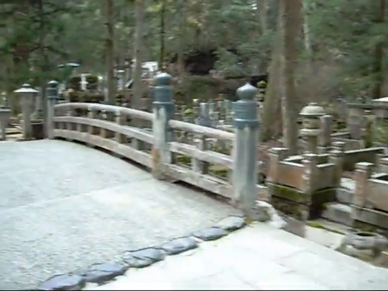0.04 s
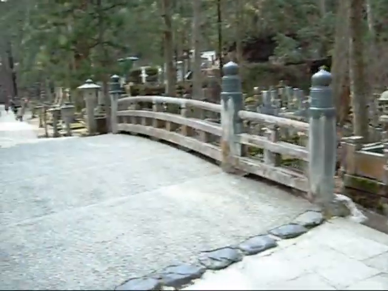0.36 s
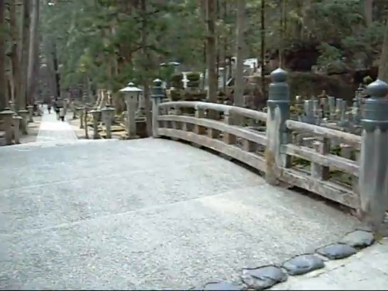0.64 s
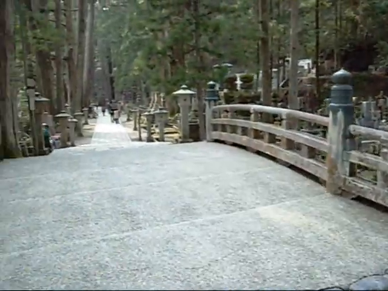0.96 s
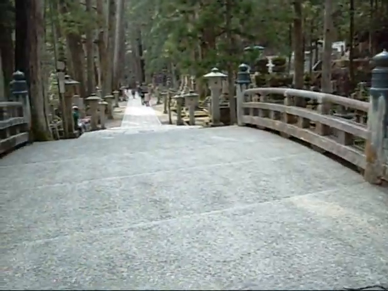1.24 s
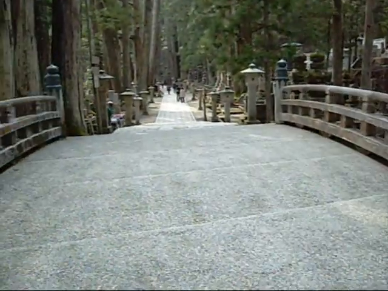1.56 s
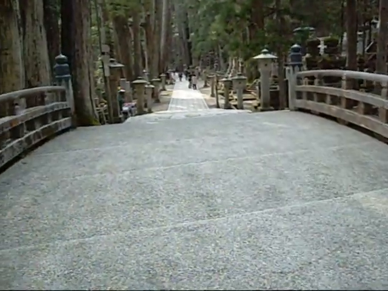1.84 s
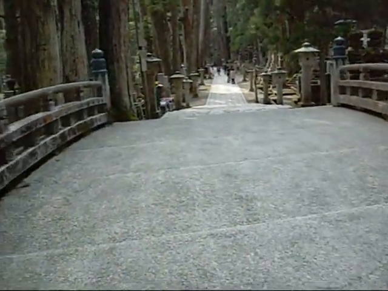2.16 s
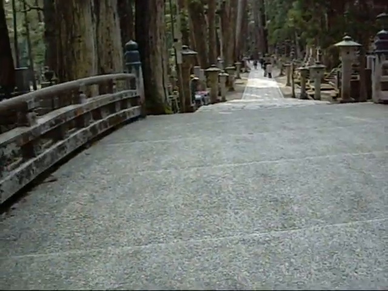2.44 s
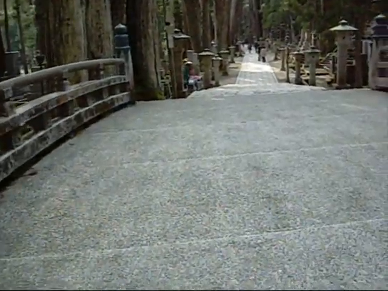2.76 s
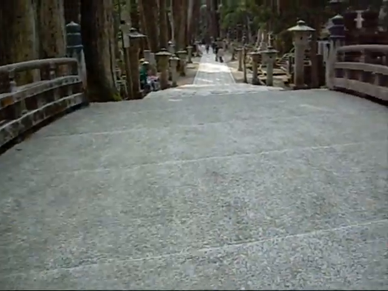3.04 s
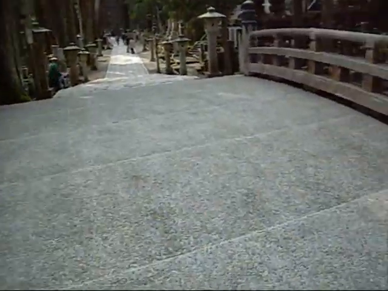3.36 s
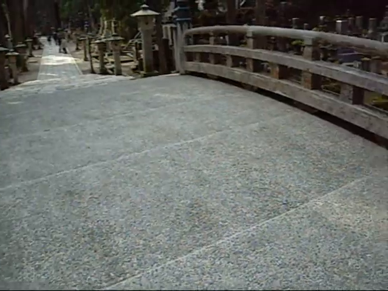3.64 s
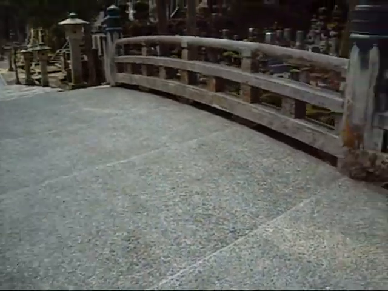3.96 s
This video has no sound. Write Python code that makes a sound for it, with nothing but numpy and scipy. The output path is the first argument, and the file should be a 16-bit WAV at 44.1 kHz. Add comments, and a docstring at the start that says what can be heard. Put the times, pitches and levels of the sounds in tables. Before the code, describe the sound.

A large distant bell is already humming at the start, one low, nearly pure tone that gently swells and dips. Between about 0.5 and 2 seconds, a few soft, slightly higher tones rise briefly beside it. Its faint overtones die first; the hum weakens from 2 seconds and is still faintly sounding at 4. Underneath lie a low outdoor rumble, a camera motor's faint hum and whine, and microphone hiss.

```python
"""A large bell, far off in a forest, heard on a stereo pair of microphones.
It is already humming at the start: one low, nearly pure tone that fades and swells as the listener
turns. In the first two seconds a few soft tones swell briefly beside it. The faint overtones die away
first; the hum is weaker but still sounding at the end. Under it all lie a low outdoor rumble and,
close by, the faint hum and whine of a camera motor and the hiss of the microphones."""
import sys
import numpy as np
from scipy import signal
from scipy.io import wavfile
from scipy.ndimage import uniform_filter1d

SR = 44100
rng = np.random.default_rng(int(sys.argv[2]) if len(sys.argv) > 2 else 0)


def materialize(psi):
    """Save the field psi as 16-bit PCM at rate SR to the path in sys.argv[1].

    A 1-D psi becomes a single channel; in a 2-D psi each row is a channel.
    """
    bounded = np.clip(np.atleast_2d(psi).T, -1, 1)
    quanta = np.round(bounded * 32767).astype(np.int16)
    wavfile.write(sys.argv[1], SR, quanta)


N = 176400

# microphone hiss (frequency [Hz], density [dB per Hz])
HISS_SPECTRUM = [(30, -112), (500, -105), (1500, -105), (3000, -106.2), (5000, -107.4), (7500, -108.3),
                 (10000, -110.3), (15000, -111.2)]
# outdoor rumble before its swells (frequency [Hz], density [dB per Hz])
RUMBLE_SPECTRUM = [(20, -120), (34, -108), (48, -92), (75, -83.5), (110, -78), (160, -82.5), (250, -88.5),
                   (370, -92), (500, -98), (700, -100.3), (1100, -108), (2500, -117), (8000, -135)]
# swells of the rumble (time [s], gain [dB])
RUMBLE_SWELLS = [(0, 0.5), (.8, 1), (1.5, 0), (2.3, 1), (2.9, 1), (3.25, 0), (3.7, 0), (4, 1.5)]
# hum of the camera motor (frequency [Hz], level [dB], left microphone's lead [rad])
MOTOR_LINES = [(117.7, -66.5, -0.82), (238, -76.5, -0.42), (467, -83.5, 0.83), (588, -84.5, 0.46),
               (710, -87.5, -0.18), (972, -91.5, .3), (1182, -96.5, .3)]
# thin whine of the camera (frequency [Hz], level [dB], left microphone's lead [rad])
WHINE_LINES = [(3158, -96, 1), (3187.5, -92, .5)]
# faint tones beside the bell's hum (centre time [s], length [s], pitch [Hz], peak level [dB])
SOFT_SWELLS = [(0.613, .26, 316, -71), (.78, 0.21, 319, -67), (1.003, .3, 316, -69),
               (1.404, 0.21, 371, -65), (1.74, 0.34, 375, -67)]
# the bell's hum at the microphones (time [s], level [dB])
BELL_LEVEL = [(0, -36), (.08, -34.9), (.24, -36), (.39, -34.5), (.48, -36.5), (.78, -36.1), (.91, -38.5),
              (1.02, -37.8), (1.11, -37), (1.33, -38.5), (1.43, -36.5), (1.71, -39.1), (1.81, -38.5),
              (2, -40.5), (2.12, -39.5), (2.3, -40.5), (2.57, -43.5), (2.78, -44.5), (3.11, -43),
              (3.18, -40.5), (3.33, -42.6), (3.49, -42), (3.68, -45), (3.75, -47.5), (3.84, -45.5),
              (4, -51.5)]
# pitch of that hum, sagging slightly (time [s], pitch [Hz])
BELL_PITCH = [(0, 211.0), (2.2, 211.3), (2.6, 210.6), (4, 210.8)]
# its place between the microphones (time [s], left minus right [dB])
BELL_PAN = [(0, .3), (2.2, -0.1), (2.85, 1), (3.4, 0), (4, -.6)]
# the bell's octave overtone, before its trim (time [s], level [dB])
BELL_OCTAVE = [(0, -77), (.17, -64.5), (.29, -76), (.4, -64.5), (.55, -67.5), (.67, -76.5), (.9, -81),
               (1.08, -68.5), (1.35, -73), (1.62, -69), (1.85, -73.5), (2.3, -79), (2.7, -82), (4, -90)]
# the bell's twelfth, before its trim (time [s], level [dB])
BELL_TWELFTH = [(0, -72), (.07, -73), (.25, -72), (.36, -68), (.46, -71), (.6, -69), (.78, -78), (.87, -68),
                (1, -74), (1.13, -85), (1.6, -79), (2.1, -84), (4, -92)]

# phase by which the left microphone leads
HUM_LEAD_RAD, OCTAVE_LEAD_RAD, TWELFTH_LEAD_RAD = -0.36, 0.5, -1.43
SIDES = np.array([[.5], [-.5]])  # left and right share of a difference
TIME = np.arange(N) / SR


def amp(db):
    """Decibels to gain."""
    return 10 ** (np.asarray(db) / 20)


def curve(points):
    """Joins (time, value) points by straight lines, with rounded corners."""
    times, values = np.transpose(points)
    return uniform_filter1d(np.interp(TIME, times, values), size=1500)


def drift(rate_hz):
    """Slow random wandering of unit size."""
    t = TIME[::128]
    rates = np.geomspace(rate_hz / 10, rate_hz, 20)
    wander = sum(np.sin(2 * np.pi * (hz * t + rng.random())) / np.sqrt(hz) for hz in rates)
    return np.interp(TIME, t, wander / wander.std())


def tone(phase, level_db, lead_rad, pan_db=0):
    """A sine at two microphones, with a phase and level difference between them."""
    return np.sqrt(2) * amp(level_db + SIDES * pan_db) * np.sin(phase + SIDES * lead_rad)


def noise(spectrum, correlation, pan_db, patch_db=0, size=2048):
    """Noise of a given density, partly shared by the two microphones, with drifting patches."""
    hz, hop = np.fft.rfftfreq(size, 1 / SR), size // 4
    a, b, c, d, patches = rng.standard_normal((N // hop + 5, len(hz), 5)).T
    patches = uniform_filter1d(patches, size=14, axis=1)  # smooth in time
    patches = uniform_filter1d(patches, size=3, axis=0)  # and in frequency
    left = a + 1j * b
    right = correlation * left + np.sqrt(1 - correlation ** 2) * (c + 1j * d)
    points_hz, points_db = np.transpose(spectrum)
    density_db = np.interp(np.log(hz + 1), np.log(points_hz), points_db)[:, None]
    bins = np.array([left, right]) * amp(density_db + patch_db * patches / patches.std())
    stereo = signal.istft(bins, nperseg=size, noverlap=size - hop)[1][:, :N]
    return stereo * np.sqrt(1.5 * SR / size) * amp(SIDES * pan_db)


def microphone_hiss():
    """The microphones' own steady noise, nearly independent left and right."""
    return noise(HISS_SPECTRUM, correlation=-0.049, pan_db=-0.3)


def outdoor_rumble():
    """Low, distant outdoor noise that gently swells and eases."""
    rumble = noise(RUMBLE_SPECTRUM, correlation=0.58, pan_db=-0.5, patch_db=1.72)
    return rumble * amp(curve(RUMBLE_SWELLS))


def camera_motor(waver_rad=0.24, waver_db=1.5):
    """Close to the microphones, a motor's faint wavering hum with a thin, steady whine on top."""
    hum = 0
    for hz, db, lead in MOTOR_LINES:
        phase = 2 * np.pi * hz * TIME + waver_rad * drift(rate_hz=8)
        hum += tone(phase, db + waver_db * drift(rate_hz=7.4), lead)
    whine = sum(tone(2 * np.pi * hz * TIME, db, lead) for hz, db, lead in WHINE_LINES)
    return hum + whine


def soft_tones():
    """Far-off pure tones, each one smooth swell."""
    tones = 0
    for centre, length, hz, db in SOFT_SWELLS:
        swell = np.cos(np.pi * np.clip((TIME - centre) / length, -.5, .5)) ** 2
        tones += tone(2 * np.pi * hz * TIME, db, HUM_LEAD_RAD) * swell
    return tones


def distant_bell(octave_trim_db=0.5, twelfth_trim_db=1, fall_db_per_s=4.5):
    """The hum and its overtones, each swelling and fading on its own way through the trees."""
    phase = 2 * np.pi * np.cumsum(curve(BELL_PITCH)) / SR
    hum_db = curve(BELL_LEVEL) + 0.4 * drift(rate_hz=9)  # the level flutters slightly
    hum = tone(phase, hum_db, HUM_LEAD_RAD, curve(BELL_PAN))
    octave = tone(2 * phase, curve(BELL_OCTAVE) + octave_trim_db, OCTAVE_LEAD_RAD, pan_db=2)
    twelfth = tone(3 * phase, curve(BELL_TWELFTH) + twelfth_trim_db, TWELFTH_LEAD_RAD, pan_db=2)
    double_octave_db = -82.5 - fall_db_per_s * TIME + 2.5 * drift(rate_hz=9)
    double_octave = tone(4 * phase, double_octave_db, OCTAVE_LEAD_RAD)
    return hum + octave + twelfth + double_octave


def scene():
    """What reaches the microphones: the far bell over soft tones, rumble and the nearby motor."""
    return distant_bell() + soft_tones() + outdoor_rumble() + camera_motor()


def record(dry):
    """The microphones add their hiss, then the top of the treble is cut off."""
    lowpass = signal.firwin(511, cutoff=15450, window=("kaiser", 9), fs=SR)
    return signal.oaconvolve(dry + microphone_hiss(), lowpass[None], "same")


dry = scene()
out = record(dry)
materialize(out)
```